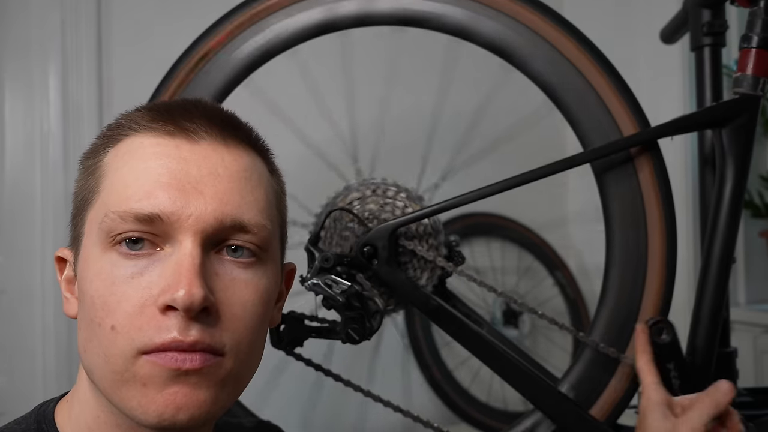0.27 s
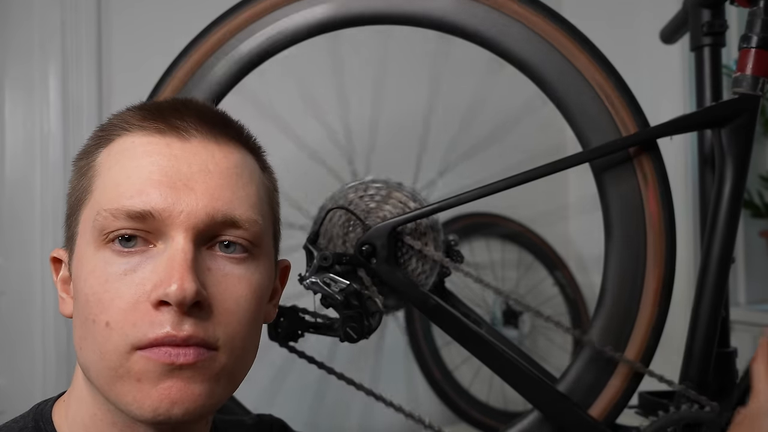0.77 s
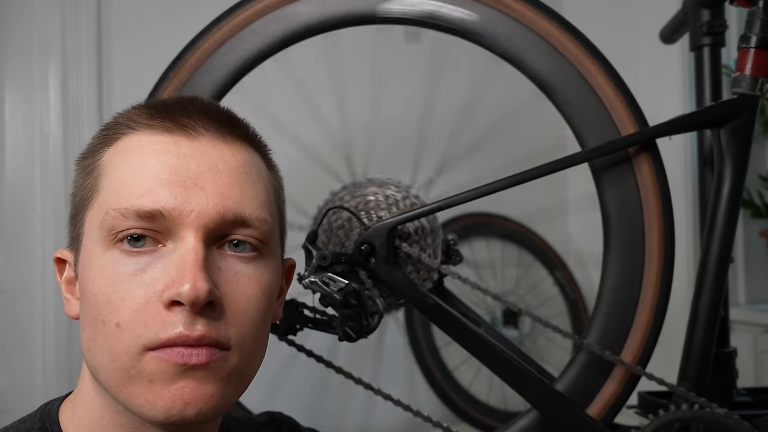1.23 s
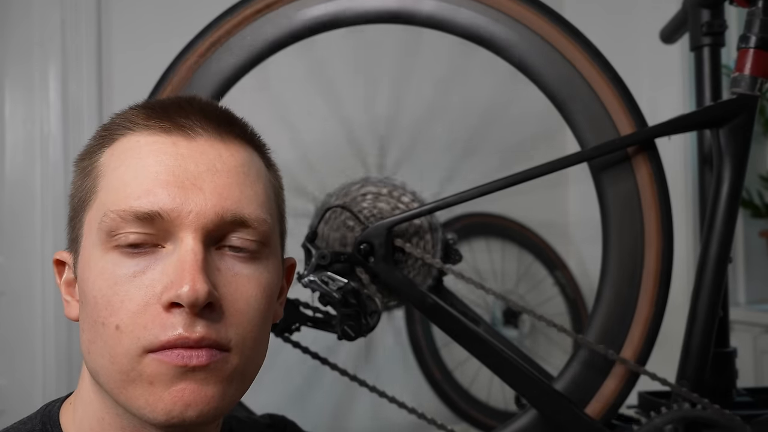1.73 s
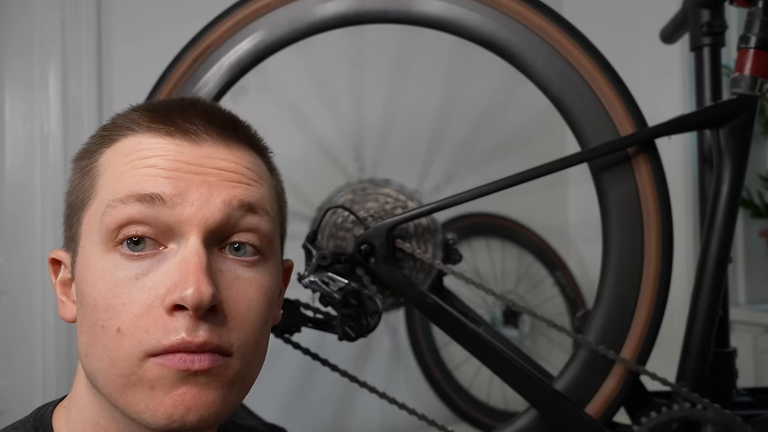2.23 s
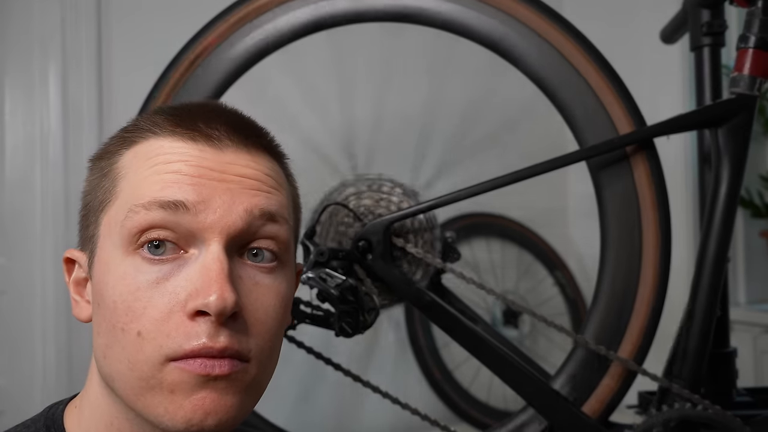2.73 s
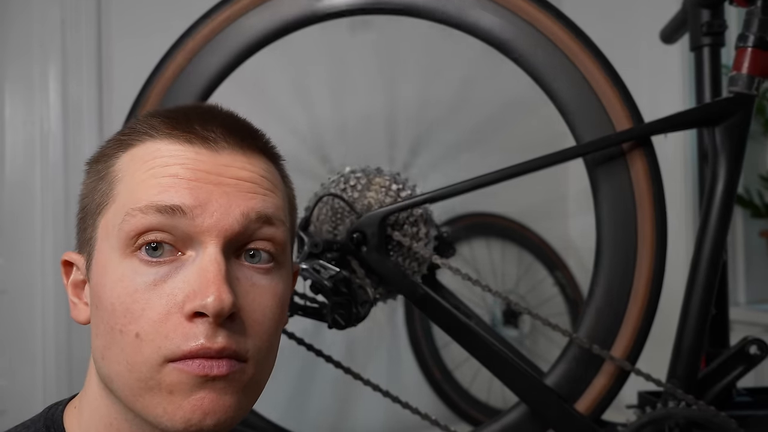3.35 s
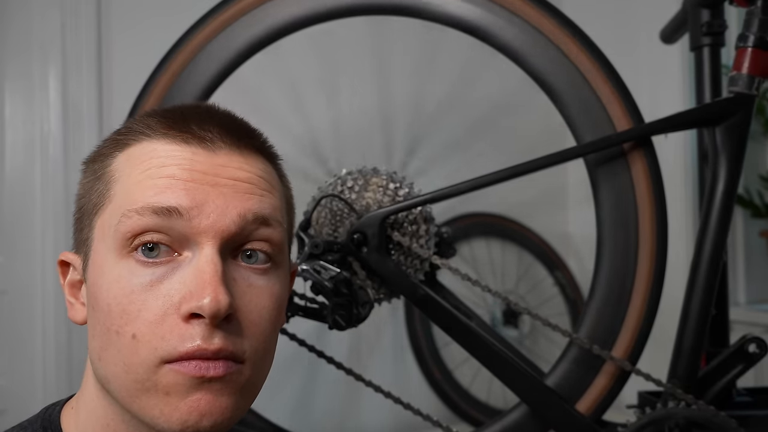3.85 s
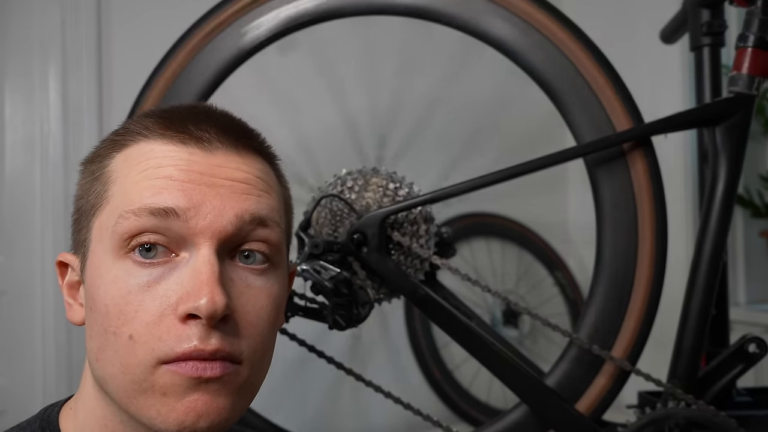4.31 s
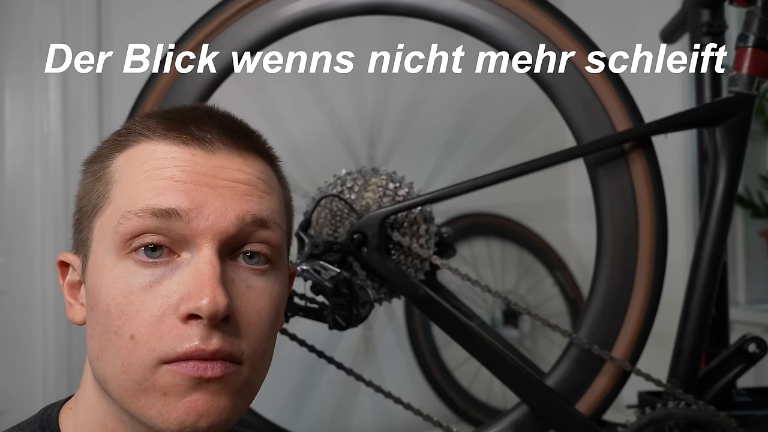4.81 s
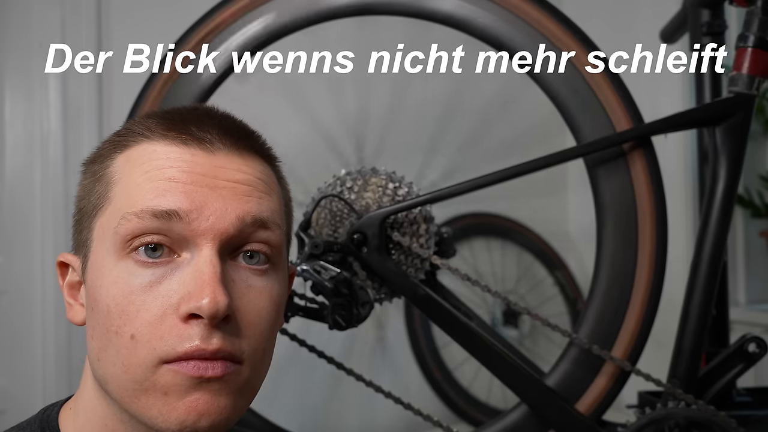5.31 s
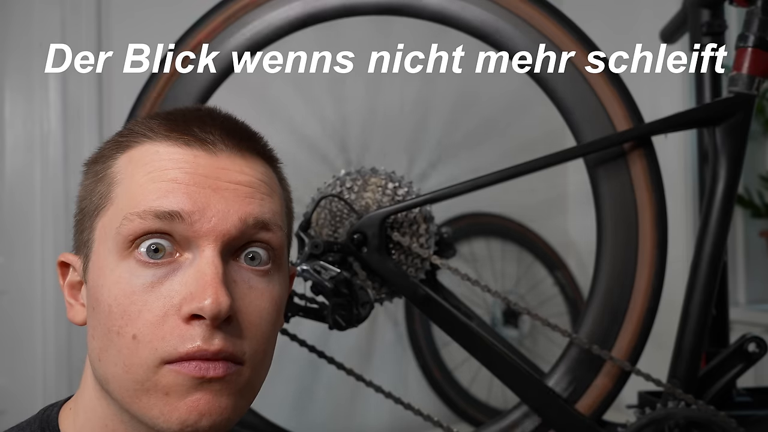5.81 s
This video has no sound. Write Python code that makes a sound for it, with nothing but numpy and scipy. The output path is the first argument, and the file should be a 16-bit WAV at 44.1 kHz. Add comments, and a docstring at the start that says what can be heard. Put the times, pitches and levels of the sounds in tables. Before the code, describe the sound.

Quiet, hard-walled workshop with a low, steady hush, heard close to a bicycle in a stand. Small metallic ticks come from a hand at the pedal, then a loud spring-latch snap bounces and rattles the frame. The chain is cranked softly with light rustles and ticks. Finally the rear wheel coasts, its hub ratchet clicking quickly, brightly and evenly until the end.

```python
"""Quiet, hard-walled workshop: a bicycle hangs in a work stand near the microphone, over steady hush.
A hand fiddles at the pedal, a spring latch snaps and rattles the frame, the chain is cranked softly,
then the rear wheel coasts and the ratchet of its hub clicks fast and evenly.
Blows ring banks of decaying modes; noise bursts make cracks; filtered grainy noise makes rub and rattle."""
import sys
import numpy as np
from scipy import signal
from scipy.fft import rfft, irfft
from scipy.io import wavfile
from scipy.ndimage import uniform_filter1d

SR = 44100
rng = np.random.default_rng(int(sys.argv[2]) if len(sys.argv) > 2 else 0)


def transcribe(u):
    """Save the signal u as a 16-bit wav file named by the first command-line argument.

    u: samples, shape (n,) or (channels, n), limited to [-1, 1]; the rate is SR.
    q: integer samples, one column per channel.
    """
    v = np.clip(np.atleast_2d(u).T, -1, 1)
    q = np.round(v * 32767).astype(np.int16)
    wavfile.write(sys.argv[1], SR, q)


def elevation(decibels):
    """Turn decibel levels (scalar or array-like) into linear amplitude ratios."""
    levels = np.asarray(decibels, float)
    return 10 ** (levels / 20)


N = 267687  # samples

# steady background spectrum: [hz, relative_db]
HUSH_SPECTRUM = [(12, -20), (20, 6.5), (70, -5.5), (100, -2), (135, -8), (300, -9), (465, -10.5),
                 (600, -11), (1080, -15), (1840, -20), (2660, -18), (5210, -23), (14700, -23), (16500, -33)]
# reverberation time of the workshop: [hz, t60_s]
ROOM_DECAY = [(150, 1), (500, 0.68), (1800, 0.66), (4500, 0.48), (9000, 0.4), (14000, 0.1)]
# first reflection: [delay_s, gain_db]
REFLECTIONS = [(0.015, -25.5)]
# effort of the hand, fiddling at the pedal and later cranking: [time_s, level_db]
HAND_EFFORT = [(0.0, -92), (0.2, -84), (0.228, -68), (0.256, -77), (0.35, -77.5), (0.72, -80), (0.78, -71),
               (1.45, -71), (1.8, -75.5), (2.16, -69), (2.3, -75), (2.45, -66.5), (2.6, -69.5),
               (3.0, -67.5), (3.12, -73), (3.25, -92)]
# how the hand's steady push colours the stand: [mode_hz, width_hz, relative_db]
STAND_MODES = [(99.2, 18, -8), (193.4, 14, -2.5), (240, 48, 0), (340.6, 45, 2.5), (421, 57, 3.5),
               (493.5, 36, -8.5), (586, 26, -21.5), (826, 38, -12.5), (888, 89, -15.5)]
# clearest ticks of chain and pedal: [start_s, level_db, centre_hz, treble_relative_db]
TICK_EVENTS = [(0.0643, -51.5, 3050, -12), (0.2174, -54, 1200, -8), (0.2239, -58, 2690, 12),
               (0.2355, -59, 2170, 14), (0.307, -55.5, 2550, -9), (0.424, -66, 3500, 15),
               (0.4597, -54.5, 3470, 7), (0.542, -54.5, 2640, 4), (0.6689, -58, 2560, -4),
               (0.757, -60, 3400, -6), (1.43, -56, 3000, 0), (1.91, -58, 2200, -4),
               (1.94, -52.5, 2600, -5.5), (2.0886, -52.5, 2600, -8), (2.1765, -50.5, 3100, -6.5),
               (2.3268, -54.5, 2590, -1.5), (2.5287, -53.5, 3290, 4), (2.6, -57, 2900, -3),
               (2.7002, -55, 3000, -7), (2.8806, -60.5, 3500, 8), (2.9609, -48.5, 3160, 8),
               (3.0279, -58, 3600, -6)]
# pedal and crank modes: [mode_hz, relative_db, t60_s]
PEDAL_MODES = [(1202, -10.5, 0.03), (1292, -18, 0.031), (1514, -9.5, 0.024), (1800, -9.5, 0.014),
               (1920, -14, 0.064), (2080, -9, .025), (2340, -6, .03), (2530, -7, .035), (2800, -6, .02),
               (3040, -13, .12), (3260, -6, .025), (3371, -6, .045), (3480, -4.5, 0.037),
               (3790, -5.5, 0.017), (4020, -9, 0.011), (4200, -12, 0.038), (5250, -19, .03)]
# frame and stand modes: [mode_hz, relative_db, t60_s]
FRAME_MODES = [(101.5, -21.5, 0.52), (191.4, -25.5, 0.59), (252.5, -13.5, 0.33), (324, -9.5, 0.15),
               (357.3, -3, .22), (425.5, -5, 0.1314), (506, 0.5, 0.11), (561.4, -6.5, 0.06),
               (606, -3, 0.0754), (689, 1.5, 0.047), (805.4, -2.5, 0.2), (907, -2.5, 0.21), (1045, -4, .08)]
# long modes of rim and spokes: [mode_hz, relative_db, t60_s]
RIM_MODES = [(356, -40, .7), (460, -34, 1.3), (556, -37, 1.5), (580, -41, 1.5), (3050, -49, 1.4),
             (4200, -48, .6)]
# blows of the latch and its rebounds: [start_s, level_db, thud_relative_db, crack_relative_db]
LATCH_BLOWS = [(0.793, -38, -15, -11.5), (0.799, -23.5, -31.5, -7), (0.805, -12, -30.5, -17.5),
               (0.808, -12, -25, -14), (0.817, -27.5, -12, -26), (0.83, -10.5, -19.5, -25),
               (0.846, -21, -16, -32.5), (0.883, -22, -12, -14.5), (0.901, -24.5, -11, -17.5),
               (0.91, -26, -23, -35.5), (0.95, -33, -27, -16), (1.018, -34.5, -1.5, -24),
               (1.06, -38, -1.5, -16.5), (1.119, -63, 0, -27)]
# colour of the latch's crack: [hz, gain_db]
LATCH_CRACK = [(1000, -36), (3000, 3.5), (4500, -5.5), (5900, -13), (7500, -1.5), (10000, 0), (12000, -2),
               (14500, -4.5), (17000, -27)]
# colour of chain and cables rattling after a blow: [hz, gain_db]
LOOSE_RATTLE = [(88, -55), (150, -22), (348, -2), (406, -27), (524, -12), (624, -4), (905, -4),
                (1290, -18.5), (2700, -12), (4950, -17), (5790, -27), (7770, -27), (16000, -62)]
# modes of hub and rim: [mode_hz, width_hz, relative_db]
WHEEL_MODES = [(416, 11, -40), (453, 11, -40), (700, 50, -26), (745, 50, -28), (1260, 90, -25),
               (1570, 110, -17), (1970, 130, -14), (2540, 110, -8), (2720, 200, -9), (3000, 250, -11),
               (3300, 170, -7), (3520, 150, -5), (3785, 120, 0), (4150, 250, -10), (5330, 70, -18),
               (6500, 120, -15), (7100, 150, -15), (8020, 150, -13)]
# colour of the crack of the ratchet's steel teeth: [hz, gain_db]
TOOTH_CRACK = [(700, -32), (1500, -16), (3500, 2.5), (4900, -5), (6500, -2.5), (8500, 0.5), (10500, -1.5),
               (11300, 0), (12200, 0.5), (13000, -3.5), (13900, 4), (14600, 2.5), (15500, 2), (16100, -35),
               (17000, -32.5)]
# cassette let go, rocks backward, comes to rest: [time_s, speed_teeth_per_s]
CASSETTE_SPEED = [(2.99, 35.9), (3.2, 6.99), (3.3, -9.13), (3.38, -6.73), (3.47, -2.94), (3.54, 0)]
# how hub shell, then rim and spokes, ring at each angle of the wheel, one row a tooth: [relative_db]
SHELL_DB_BY_TOOTH = [-40, -43, -39.5, -39.5, -42, -40.5, -46, -38.5, -37.5, -43, -40, -38, -44, -37, -51.5,
                     -38, -39.5, -41, -37, -47.5, -40.5, -43, -37, -41, -35.5, -37.5, -44.5, -39.5, -39,
                     -36.5, -38.5, -38, -39.5, -36, -37, -41]
RIM_DB_BY_TOOTH = [-41.5, -39.5, -37.5, -39.5, -40.5, -39.5, -47.5, -40.5, -37, -40, -38.5, -42, -40.5,
                   -41.5, -37.5, -37, -38.5, -49.5, -40, -37.5, -44, -39, -41.5, -39, -39.5, -40.5, -36.5,
                   -41.5, -39.5, -42, -39, -42, -40, -39.5, -38.5, -39]

HUSH_RMS_DB = -71.5
RUSTLE_REL_DB, LINKS_PER_S = -14.5, 25  # chain rustle relative to frame shake; stray link contacts
SHELL_LOW_HZ, SHELL_HIGH_HZ = 2900, 4500  # modes in this band are the hub shell's
TEETH_PER_TURN = 36
COAST_S, COAST_TOOTH = 3.5758, 17  # reference time and the wheel's mean angle then, in teeth
COAST_TEETH_PER_S, DRAG_TEETH_PER_S2 = 35.6015, .7557
HEAVY_SPOT_TEETH, HEAVY_SPOT_RAD = .0195, .55  # the unbalanced rim runs ahead and behind once a turn
CRACK_DB, CRACK_SCATTER_DB, JITTER_S = -28.5, 1.0, .0003  # before colour and mix gain; scatters are std
FULL_DROP_TEETH_PER_S = 19.6  # slower than this, the teeth land softer


def read(points, hz):
    """Spectrum table read on a log-frequency axis."""
    f, value = np.transpose(points)
    return np.interp(np.log(hz + 1), np.log(f + 1), value)


def evened(x):
    """Scaled to rms 1."""
    return x / np.sqrt(np.mean(x ** 2) + 1e-20)


def coloured(x, points):
    """Linear-phase filter drawn from a spectrum table."""
    hz = np.linspace(0, SR / 2, 513)
    gain = elevation(read(points, hz)) * (hz < SR / 2)
    return signal.oaconvolve(x, signal.firwin2(513, hz, gain, fs=SR), "same")


def ring(x, hz, width_hz):
    """One decaying mode: two-pole resonator with zero gain at DC."""
    radius = np.exp(-np.pi * width_hz / SR)
    step_rad = 2 * np.pi * hz / SR
    return signal.lfilter([.5, 0, -.5], [1, -2 * radius * np.cos(step_rad), radius ** 2], x)


def widths(modes):
    """Decay times turned into resonance widths: (hz, width_hz, db)."""
    return [(hz, np.log(1000) / np.pi / t60_s, db) for hz, db, t60_s in modes]


def bursts(times_s, db, rise_s):
    """Patter of contacts at each time: fresh noise that swells and dies, its energy set by db."""
    length = 1024
    u = np.arange(length) / SR / rise_s
    rows = rng.standard_normal((len(times_s), length)) * u ** 2 * np.exp(-u)
    rows *= elevation(np.array(db))[:, None] / np.linalg.norm(rows, axis=1, keepdims=True)
    starts = np.round(np.array(times_s) * SR).astype(int)
    out = np.zeros(N + length)
    np.add.at(out, starts[:, None] + np.arange(length), rows)
    return out[:N]


def struck(times_s, db, modes, spread_s, uneven_db):
    """Rings modes (hz, width_hz, db); each blow reaches each mode at its own delay and strength."""
    delay_s = rng.random((len(times_s), len(modes))) * spread_s
    size = elevation(db[:, None] + uneven_db * rng.standard_normal(delay_s.shape))
    out = np.zeros(N)
    for k, (hz, width_hz, mode_db) in enumerate(modes):
        at = np.round((times_s + delay_s[:, k]) * SR).astype(int)
        blows = np.bincount(at, size[:, k], minlength=N)[:N]
        out += elevation(mode_db) * ring(blows, hz, width_hz)
    return out


def workshop(x, wet_db):
    """Direct sound, first reflection, and two dense tails whose blend rotates 5.3 times a second."""
    out = x.copy()
    for delay_s, gain_db in REFLECTIONS:
        delay = round(delay_s * SR)
        out[delay:] += elevation(gain_db) * x[:-delay]
    hz, t, z = signal.stft(rng.standard_normal((2, SR)), SR, nperseg=256)
    decay = elevation(-60 * t / read(ROOM_DECAY, hz)[:, None])
    tails = signal.istft(z * decay, SR, nperseg=256)[1]
    tails *= 1 - np.exp(-np.arange(tails.shape[1]) / SR / 0.002)  # soft onset
    blend_rad = 2 * np.pi * 5.3 * np.arange(N) / SR
    fed = x * np.array([np.cos(blend_rad), np.sin(blend_rad)])
    wet = signal.fftconvolve(fed, tails / np.linalg.norm(tails[0]), axes=1)[:, :N].sum(0)
    return out + elevation(wet_db) * wet


def hush():
    """Steady background: stationary noise shaped in the spectrum."""
    hz = np.fft.rfftfreq(N, 1 / SR)
    spectrum = rfft(rng.standard_normal(N)) * elevation(read(HUSH_SPECTRUM, hz))
    return elevation(HUSH_RMS_DB) * evened(irfft(spectrum, N))


def drivetrain():
    """Hand and chain rub: grainy drive shakes the frame; grain and stray links excite pedal modes."""
    swell = uniform_filter1d(rng.standard_normal((2, N)), 400, axis=1) * 20  # std 1
    grain = rng.standard_normal((2, N)) * elevation(3.25 * swell)
    link_db = 25.0 + 4.0 * np.minimum(rng.exponential(1, N), 3)
    links = elevation(link_db) * (rng.random(N) < LINKS_PER_S / SR)
    shake = evened(sum(elevation(db) * ring(grain[0], hz, width_hz) for hz, width_hz, db in STAND_MODES))
    rub = grain[1] + links
    rustle = evened(sum(elevation(db) * ring(rub, hz, width_hz=150) for hz, db, _ in PEDAL_MODES if hz > 1800))
    effort = elevation(np.interp(np.arange(N) / SR, *np.transpose(HAND_EFFORT)))
    return effort * (shake + elevation(RUSTLE_REL_DB) * rustle)


def ticks():
    """Tiny contacts: each rings the pedal modes nearest its centre, with a wisp of treble."""
    s, db, centre_hz, treble_db = np.transpose(TICK_EVENTS)
    rung = np.zeros(N)
    for hz, *_ in PEDAL_MODES:
        near_db = db - 26.0 * abs(np.log2(hz / centre_hz))  # 26 dB less per octave away
        rung += struck(s, near_db, [(hz, 150, 0)], spread_s=.005, uneven_db=3.5)
    treble = ring(bursts(s, db + treble_db, rise_s=0.00098), hz=8500, width_hz=6100)
    return elevation(-10.5) * rung + treble


def rim():
    """Hollow hum lingering after the snap: the hardest blow rings the long modes of rim and spokes."""
    s, level_db, *_ = max(LATCH_BLOWS, key=lambda row: row[1])
    return struck(np.array([s]), np.array([level_db]), widths(RIM_MODES), spread_s=.01, uneven_db=1.5)


def latch():
    """Each blow cracks, rings the pedal, shakes the frame and sets loose parts rattling."""
    s, level_db, thud_db, crack_db = np.transpose(LATCH_BLOWS)
    pedal = struck(s, level_db, widths(PEDAL_MODES), spread_s=.0016, uneven_db=3.5)
    frame = struck(s, level_db + thud_db, widths(FRAME_MODES), spread_s=0.00624, uneven_db=2.5)
    crack = coloured(bursts(s, level_db + crack_db, rise_s=0.00099), LATCH_CRACK)
    blow_energy = np.bincount(np.round(s * SR).astype(int), elevation(2 * level_db), minlength=N)
    energy_keep = elevation(-2 * 60 / 0.35 / SR)  # per sample: 60 dB in 0.35 s
    shaking = np.sqrt(signal.lfilter([1], [1, -energy_keep], blow_energy))
    clumps = elevation(4 * evened(uniform_filter1d(rng.standard_normal(N), 150)))
    rattle = shaking * evened(coloured(clumps * rng.standard_normal(N), LOOSE_RATTLE))
    return elevation(-12.0) * pedal + elevation(-8.5) * frame + elevation(20.5) * crack + elevation(-26.5) * rattle


def teeth():
    """One drop per tooth the wheel gains on the cassette: times, wheel angles (teeth), closing speeds."""
    t = np.arange(CASSETTE_SPEED[0][0], N / SR - .01, 1e-4)
    since = t - COAST_S
    wheel = COAST_TOOTH + COAST_TEETH_PER_S * since - DRAG_TEETH_PER_S2 * since ** 2 / 2
    turn_rad = 2 * np.pi * (wheel - COAST_TOOTH) / TEETH_PER_TURN
    wheel += HEAVY_SPOT_TEETH * np.cos(turn_rad + HEAVY_SPOT_RAD)
    cassette_speed = np.interp(t, *np.transpose(CASSETTE_SPEED))
    still_to_turn = np.cumsum(cassette_speed[::-1])[::-1] * (t[1] - t[0])
    gained = wheel + still_to_turn
    drops = np.flatnonzero(np.diff(np.floor(gained)) > 0)
    angle = np.round(wheel[drops]).astype(int) % TEETH_PER_TURN
    return t[drops], angle, np.gradient(gained, t)[drops]


def ratchet():
    """Teeth drop and chatter for some milliseconds: a bright crack, and hub and rim modes ring."""
    s, angle, speed = teeth()
    chance = rng.standard_normal((len(s), 2))
    s = s + JITTER_S * chance[:, 0]
    soft_db = 20 * np.log10(np.minimum(speed / FULL_DROP_TEETH_PER_S, 1))
    crack_db = CRACK_DB + soft_db + CRACK_SCATTER_DB * chance[:, 1]
    shell_modes = [m for m in WHEEL_MODES if SHELL_LOW_HZ < m[0] < SHELL_HIGH_HZ]
    rim_modes = [m for m in WHEEL_MODES if m not in shell_modes]
    rim_db = np.take(RIM_DB_BY_TOOTH, angle) + soft_db
    shell_db = np.take(SHELL_DB_BY_TOOTH, angle) + soft_db
    ringing = struck(s, rim_db, rim_modes, spread_s=.003, uneven_db=2.5)
    ringing += struck(s, shell_db, shell_modes, spread_s=.002, uneven_db=3.5)
    patter = bursts(s, crack_db, rise_s=0.00039)
    patter += bursts(s + 0.0008, crack_db - 3, rise_s=0.0014)
    crack = coloured(patter, TOOTH_CRACK)
    return workshop(elevation(2.0) * ringing, wet_db=-6.5) + workshop(elevation(13.0) * crack, wet_db=-8.0)


def scene():
    """The bicycle in the workshop over the hush, one channel."""
    background = hush() + drivetrain()
    contacts = workshop(ticks(), wet_db=-5.5)
    snap = rim() + workshop(latch(), wet_db=-9)
    return (background + contacts + snap + ratchet())[None]


def low_pass(x):
    """Removes everything above the highest recorded frequency."""
    return signal.sosfilt(signal.butter(12, 16650, fs=SR, output="sos"), x)


def record(dry):
    """The scene is the finished mix, its treble ending at the recorder's cut-off; no gain is added."""
    return low_pass(dry)


dry = scene()
out = record(dry)
transcribe(out)
```